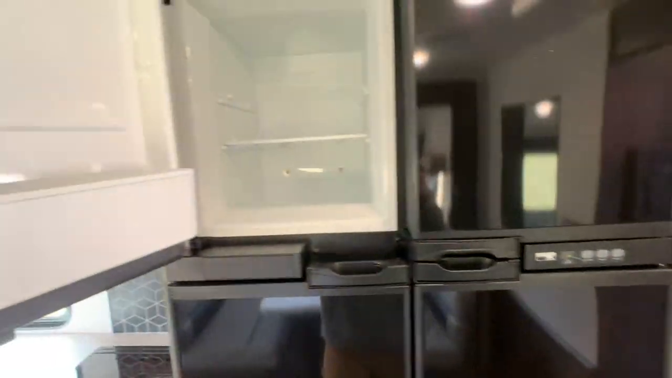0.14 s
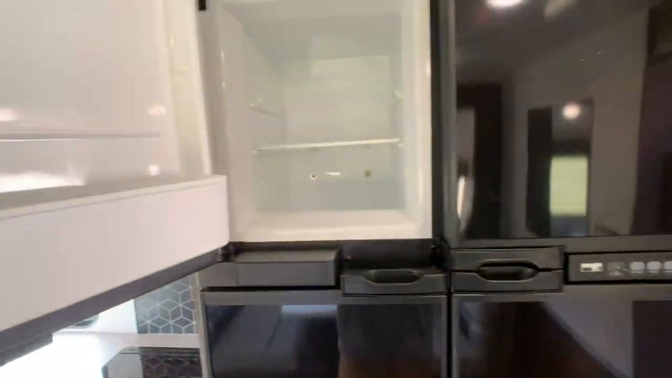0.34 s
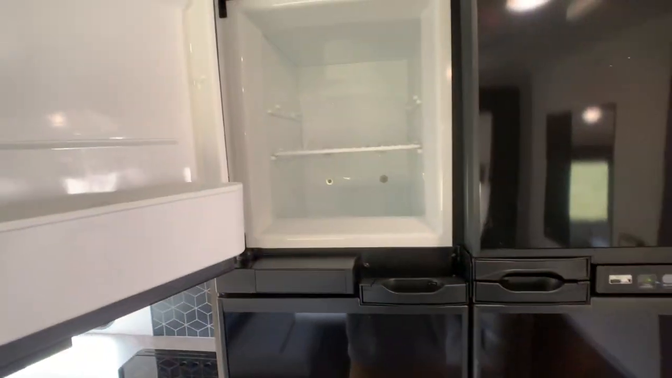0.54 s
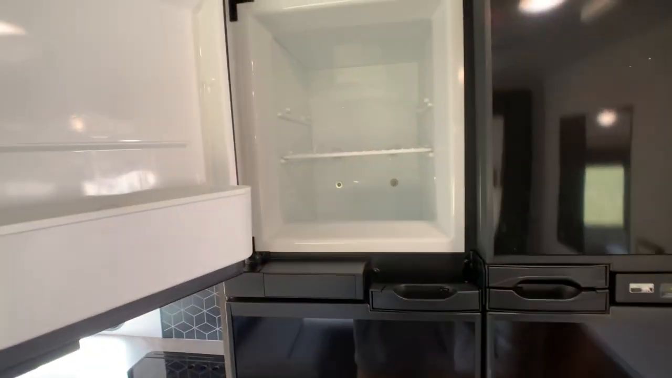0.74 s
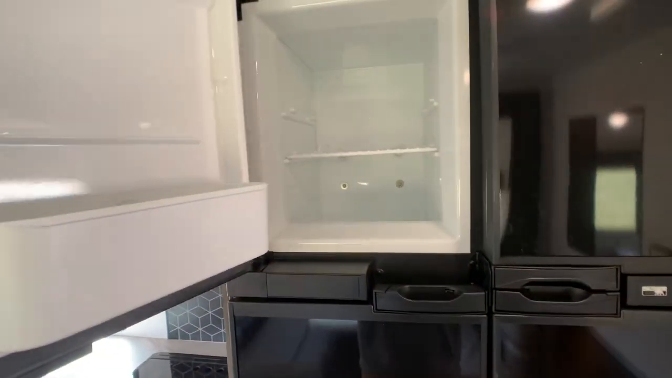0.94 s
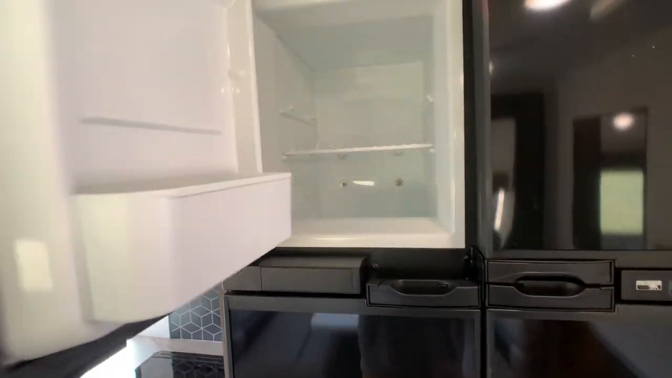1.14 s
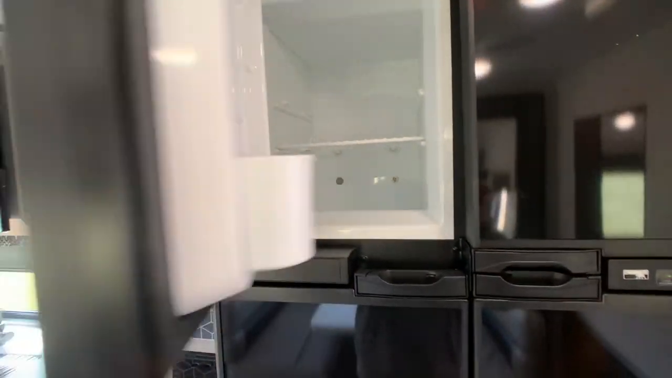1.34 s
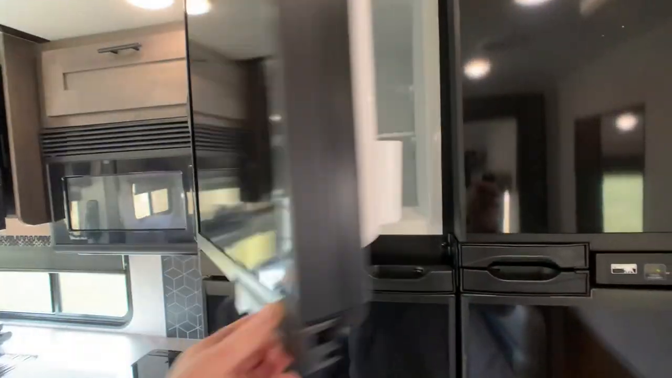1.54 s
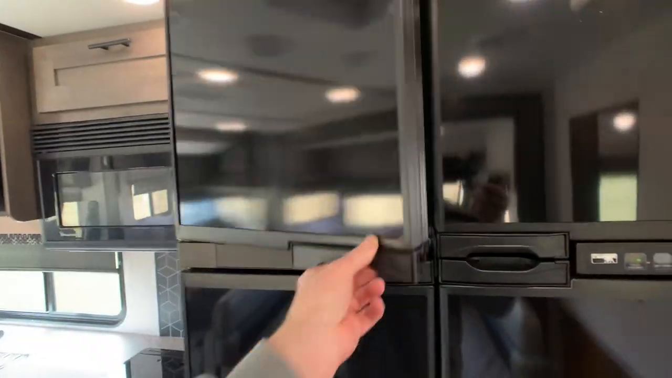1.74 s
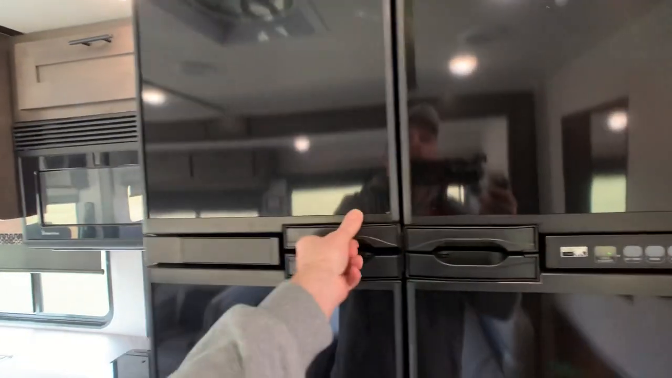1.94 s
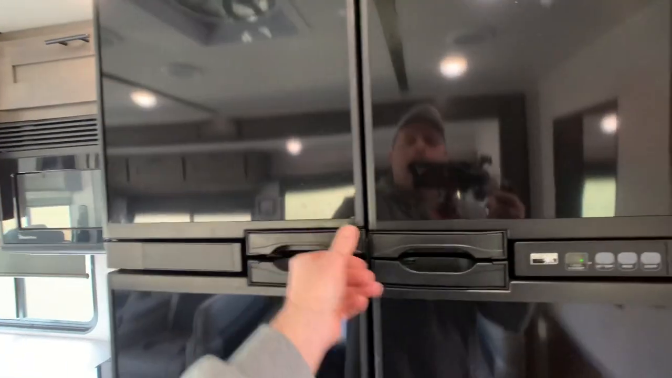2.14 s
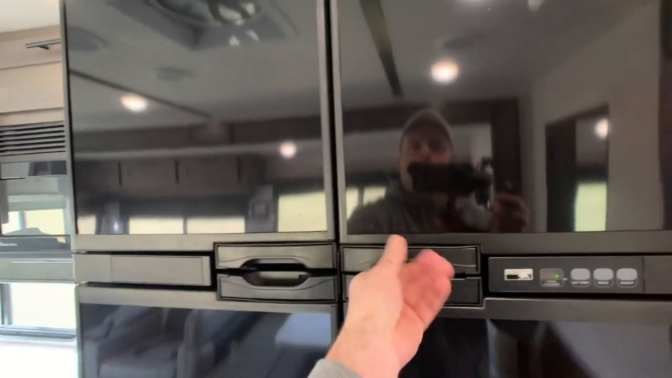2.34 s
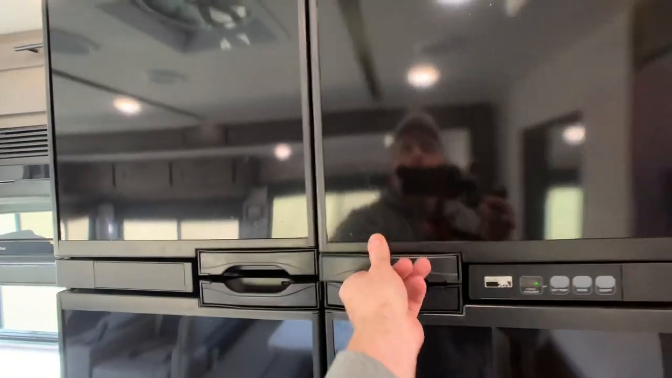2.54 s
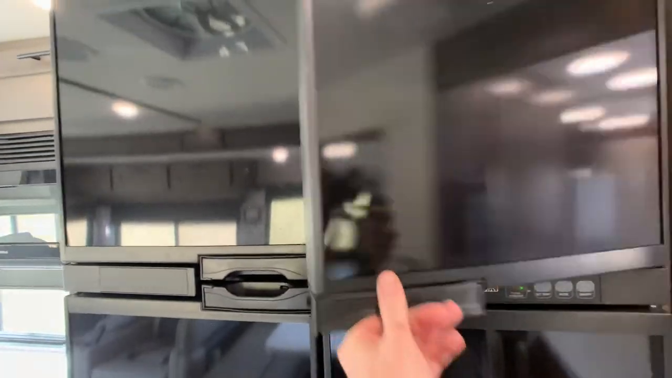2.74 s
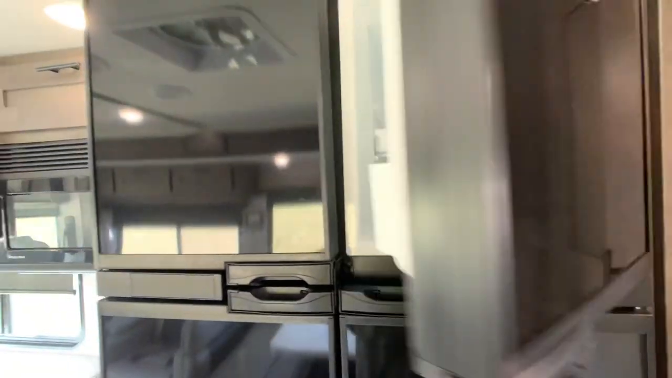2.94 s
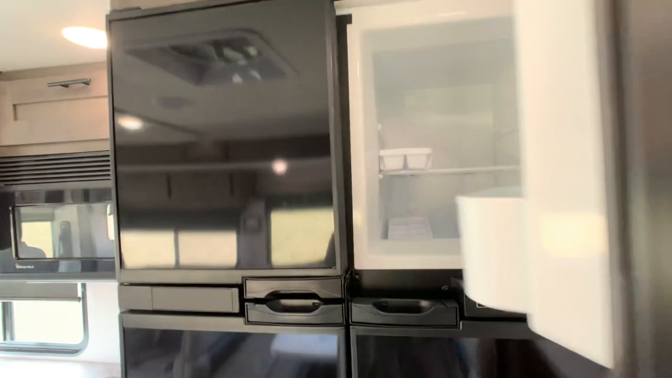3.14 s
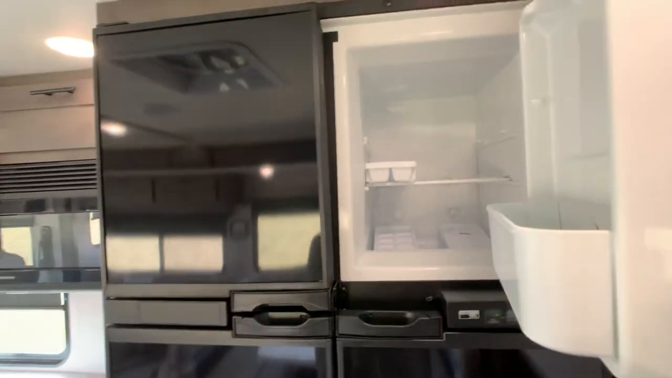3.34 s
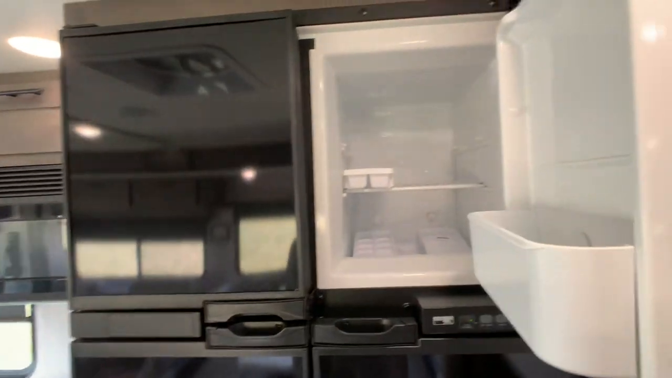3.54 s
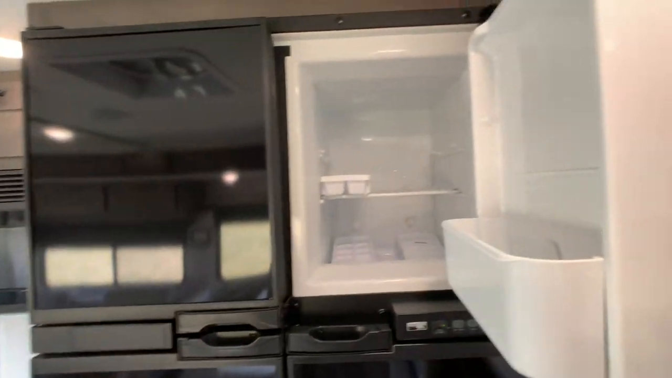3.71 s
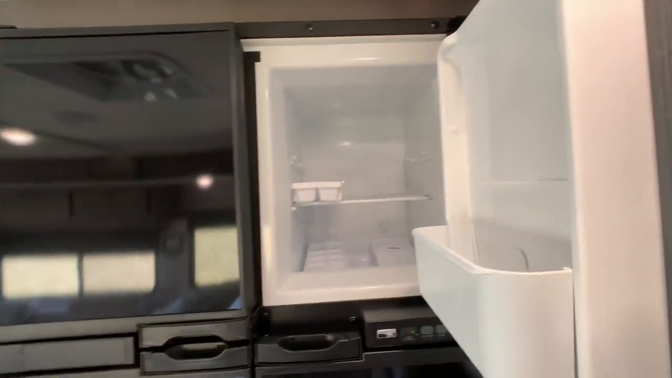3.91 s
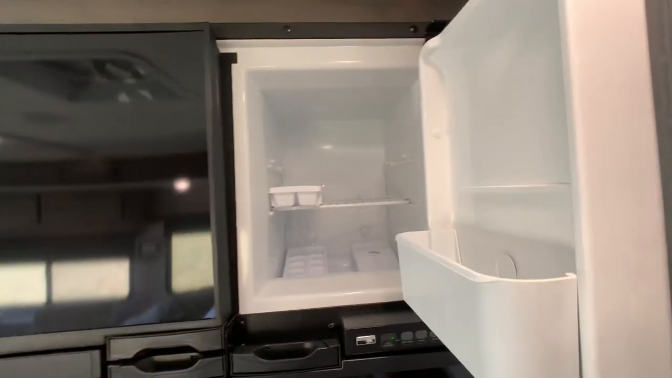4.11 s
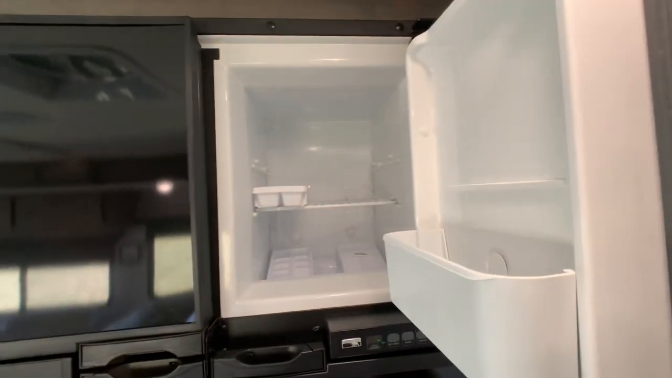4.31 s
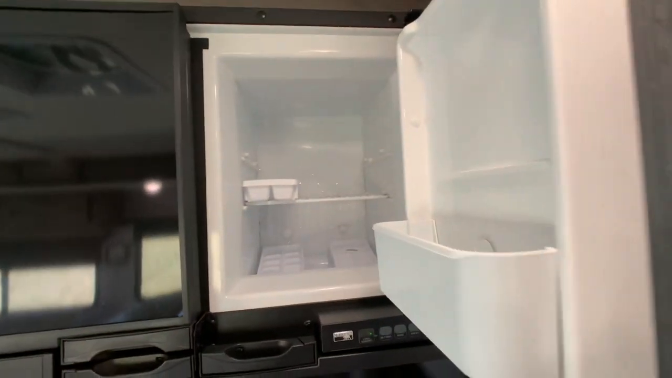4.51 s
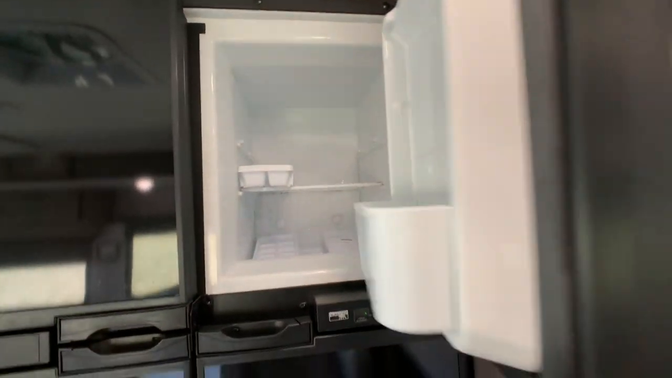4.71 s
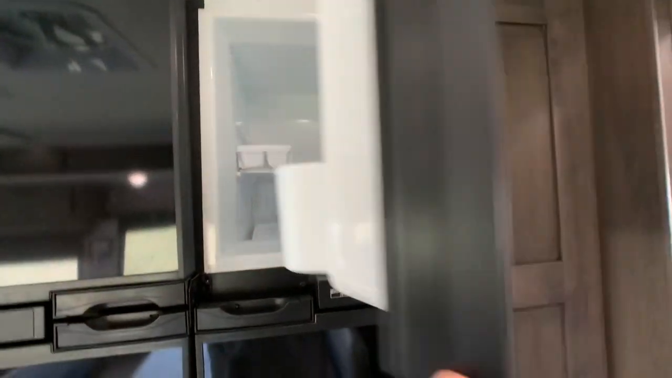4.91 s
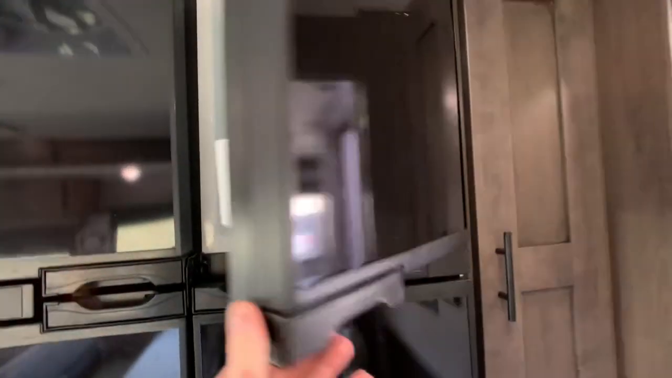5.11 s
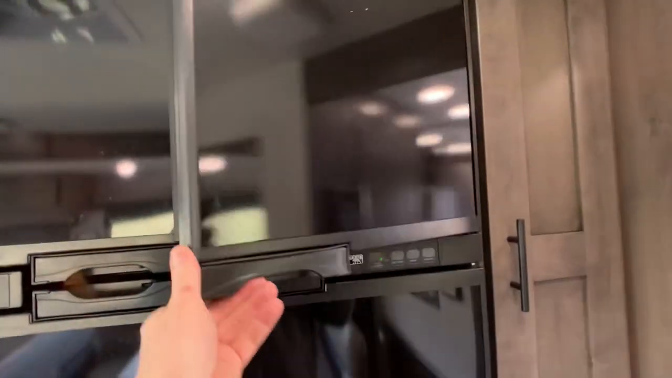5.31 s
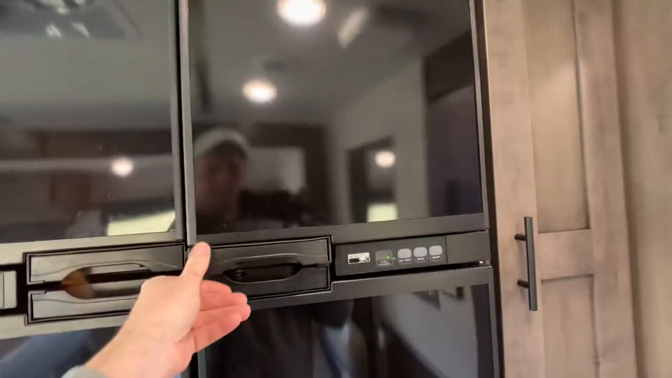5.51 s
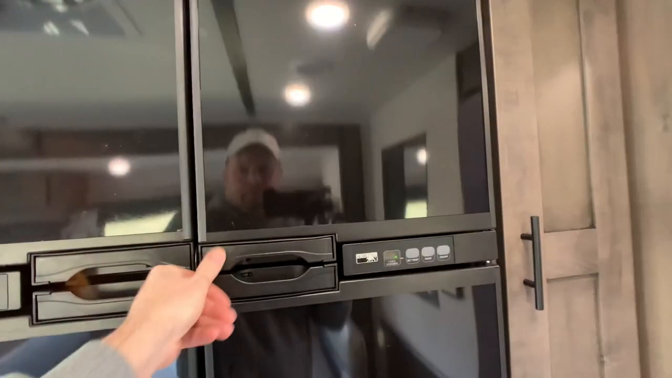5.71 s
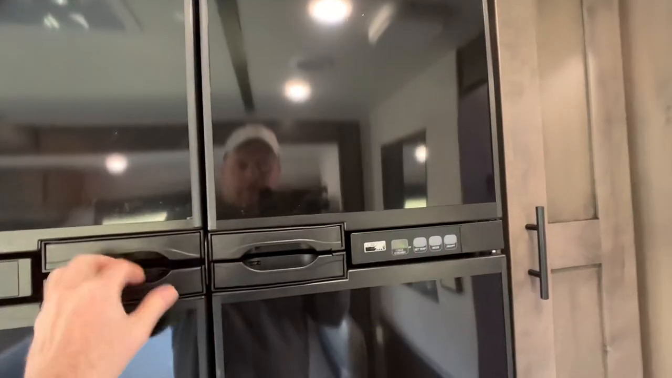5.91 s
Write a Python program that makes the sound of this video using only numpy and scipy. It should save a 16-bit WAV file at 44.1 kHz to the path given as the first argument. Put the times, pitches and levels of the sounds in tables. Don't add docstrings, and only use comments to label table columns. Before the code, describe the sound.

Close plastic latches clack as two hollow refrigerator doors swing and slam shut in a small cabin, with shelf rattles over faint hum.

```python
import sys
import numpy as np
from scipy import signal
from scipy.fft import rfft, irfft, next_fast_len
from scipy.io import wavfile
from scipy.ndimage import map_coordinates

SR = 44100
rng = np.random.default_rng(int(sys.argv[2]) if len(sys.argv) > 2 else 0)


def decibels_to_gain(level_db):
    exponent = np.asarray(level_db, float) / 20
    return 10 ** exponent


def file_out(sig):
    cols = np.atleast_2d(sig).T
    lim = np.clip(cols, -1, 1)
    pcm = np.round(lim * 32767).astype(np.int16)
    wavfile.write(sys.argv[1], SR, pcm)


N = 267246


def unit(x):
    return x / np.sqrt(np.mean(x ** 2) + 1e-20)


def along(points, hz):
    f, v = np.transpose(points)
    return np.interp(np.log(hz + 0.84), np.log(f + 0.055), v)


def curve(rows):
    s, db = np.transpose(rows)
    after = db[-1] if s[-1] > N / SR - 0.05 else -150
    return np.interp(np.arange(N) / SR, s, db, left=-150, right=after)


def wobble(rate):
    knots = rng.standard_normal(int(N * rate / SR) + 4)
    return map_coordinates(knots, [np.arange(N) * rate / SR])


def filtered(x, response):
    m = next_fast_len(x.shape[-1] + SR // 8)
    spectrum = rfft(x, m) * response(np.fft.rfftfreq(m, 1 / SR))
    return irfft(spectrum, m)[..., :x.shape[-1]]


def noise(spectrum):
    return unit(filtered(rng.standard_normal(N), lambda hz: decibels_to_gain(along(spectrum, hz))))


def strokes(rows, rise, fall):
    t = np.arange(N) / SR
    gain = np.zeros(N)
    for s, hold, db in rows:
        swell = rise * np.maximum(s - t, 0)
        fade = fall * np.maximum(t - s - hold, 0)
        gain += decibels_to_gain(db - swell - fade)
    return gain


def ring(x, modes, top_hz):
    def body(f):
        total = 0
        for k, (hz, width, db) in enumerate(modes):
            resonance = 1j * f * width / (hz * hz - f * f + 1j * f * width)
            total = total + (-1) ** k * decibels_to_gain(db) * resonance
        return total / (1 - (f / top_hz) ** 2 + 1.4j * f / top_hz)

    power = np.mean(abs(body(np.linspace(0, SR / 2, 3500))) ** 2)
    return filtered(x, body) / np.sqrt(power)


def chatter(length, rise, spiky_db):
    t = np.arange(SR // 6) / SR
    length = max(length, 0.0005)
    bumps = np.repeat(decibels_to_gain(spiky_db * rng.standard_normal(len(t) // 64 + 1)), 64)[:len(t)]
    shape = (1 - np.exp(-t / (rise * length))) * np.exp(-(t / length) ** 1.3)
    force = rng.standard_normal(len(t)) * shape * bumps
    energy = np.linalg.norm(shape)
    return np.array([force * energy / np.linalg.norm(force), energy * (t == 0)])


# (frequency [Hz], time to fall 60 dB [s])
CABIN = [(60, 0.38), (160, 0.34), (420, 0.24), (1100, .25), (3000, 0.33), (8000, 0.33), (15000, 0.19)]


def cabin(x, build):
    hz, t, z = signal.stft(rng.standard_normal(SR // 3), SR, nperseg=256)
    fading = z * decibels_to_gain(-60 * t / along(CABIN, hz)[:, None])
    tail = signal.istft(fading, SR, nperseg=256)[1]
    tail = tail * (1 - np.exp(-np.arange(len(tail)) / SR / build))
    return signal.fftconvolve(x, tail / np.linalg.norm(tail))


def placed(sounds, wet_db):
    lead = SR // 10
    out = np.zeros(N + lead + 2 * SR)
    for s, length, (near, push) in sounds:
        far = cabin(0.86 * push + 0.4 * near, 0.002 + 0.25 * abs(length))
        start = round(s * SR) + lead
        out[start:][:len(near)] += near
        out[start:][:len(far)] += decibels_to_gain(wet_db) * far
    return out[lead:lead + N]


# (frequency [Hz], level [dB per Hz])
HISS = [(500, -33), (900, -6), (2000, -13.5), (4500, -15), (9000, -15.5), (14400, -24.5), (15700, -20.5)]


def hiss():
    return decibels_to_gain(-83.5) * noise(HISS)


# (frequency [Hz], level [dB per Hz])
SWAY = [(1, -41.5), (3, -8), (7, 2), (11, -2.5), (16, -12.5), (26, -33), (45, -42), (70, -73), (120, -120)]
# (time [s], level [dB])
SWAYING = [(0.0, -11.5), (0.07, -36.5), (0.57, -28.5), (0.66, -37), (1.77, -27), (1.96, -32.5),
           (2.16, -30.5), (2.33, -34.5), (2.45, -27), (2.58, -40), (2.65, -30), (3.75, -28), (3.85, -45),
           (3.91, -33), (5.96, -34.5), (6.06, -22.5)]


def air_pressure():
    return decibels_to_gain(curve(SWAYING)) * noise(SWAY)


# (frequency [Hz], level [dB per Hz])
HUM = [(40, -60), (62, -15.5), (78, -5.5), (89, -6), (100, -12), (125, -18.5), (190, -65.5)]


def hum():
    motor = unit(decibels_to_gain(1.5 * wobble(5.6)) * noise(HUM))
    open_door = strokes([(2.6, 2.07, -70.5)], rise=60, fall=30.5)
    return decibels_to_gain(3.5) * (decibels_to_gain(-69.5) + open_door) * motor


# (frequency [Hz], level [dB per Hz])
MURMUR = [(90, -48), (150, -8.5), (200, -7), (240, -6.5), (290, 0), (335, -8.5), (385, -0.5), (450, -9.5),
          (520, -5.5), (620, -13.5), (1000, -24), (1600, -38)]
# (time [s], level [dB])
STIR = [(0.0, -62.5), (0.18, -79.5), (0.74, -82), (1.28, -81), (1.5, -74.5), (1.64, -75.5), (2.45, -77),
        (2.58, -60.5), (2.68, -61.5), (2.85, -74), (3.85, -86), (4.25, -89), (5.43, -77.5), (5.64, -58),
        (5.96, -72), (6.06, -54)]


def murmur():
    level = decibels_to_gain(-67.5) + decibels_to_gain(curve(STIR) + 3)
    return level * unit(decibels_to_gain(1.2 * wobble(6.7)) * noise(MURMUR))


# (frequency [Hz], level [dB per Hz])
MOVING = [(500, -25), (800, -4.5), (1500, -3), (3000, -11), (5000, -13), (9000, -32)]
# (frequency [Hz], level [dB per Hz])
CLOTH = [(400, -54), (900, -5), (2000, -7), (3500, -10), (6000, -9.5), (9000, -14.5), (13000, -28),
         (16000, -32)]
# (time [s], hold [s], level [dB])
STROKES = [(1.094, .01, -72), (1.25, .01, -71), (3.15, .2, -75), (3.64, .095, -76), (4.4, .02, -72),
           (4.51, 0.026, -71.5), (4.776, .05, -72), (5.385, 0.015, -61.5)]


def sleeves():
    grains = decibels_to_gain(1.9 * wobble(370) + 1.1 * wobble(36))
    rubbing = strokes(STROKES, rise=350, fall=184) * unit(grains * noise(CLOTH))
    stirring = decibels_to_gain(curve(STIR) + 3.5 + 1.3 * wobble(7.4)) * noise(MOVING)
    return rubbing + stirring


# (frequency [Hz], width [Hz], level [dB])
LATCH = [(1300, 440, -5), (1696, 310, 0), (1897, 310, -1), (2437, 320, -7), (3000, 620, -10)]
# (frequency [Hz], width [Hz], level [dB])
DOOR = [(330, 50, -2), (524, 110, 3), (622, 270, 0), (940, 260, -3), (1143, 200, -12)]
# (frequency [Hz], width [Hz], level [dB])
SNAP = [(3820, 1200, 1), (5370, 490, 2.5), (5820, 650, 1.5), (7140, 470, -2), (8180, 900, -5),
        (13480, 1700, -21)]
# (time [s], hold [s], level [dB])
SCRAPES = [(1.25, 0.18, -68), (2.42, .18, -60), (2.63, 0.13, -57), (2.75, 0.033, -54), (5.5, 0.11, -74),
           (5.94, .07, -56), (6.04, .03, -58)]


def scraping():
    slips = decibels_to_gain(3.7 * wobble(250) + 4.8 * wobble(40)) * rng.standard_normal(N)
    plastic = ring(slips, LATCH, 4000)
    plastic += decibels_to_gain(2.0) * ring(slips, DOOR, 1300)
    plastic += decibels_to_gain(-3.0) * ring(slips, SNAP, 9000)
    return strokes(SCRAPES, rise=230, fall=140) * decibels_to_gain(-2.5) * unit(plastic)


# (frequency [Hz], width [Hz], level [dB])
WIRE = [(1850, 27, -0.5), (2730, 84, 0), (3140, 28, -3.5), (3410, 37, -3.5), (6060, 32, -8.5),
        (6380, 36, -10.5)]
# (time [s], peak level [dB], chatter [s])
WIRE_HITS = [
    (1.3786, -61, .004),
    (1.411, -41.5, 0.005),
    (1.568, -47, .006),
    (1.586, -46.5, .01),
]


def wire_shelf():
    for s, db, length in WIRE_HITS:
        push = chatter(length, rise=0.15, spiky_db=2.8)
        yield s, length, decibels_to_gain(db) * ring(push, WIRE, 9000)


# (time [s], peak level [dB], chatter [s])
SEAL = [
    (2.0, -35, 0.043),
    (5.702, -33.5, 0.027),
]
CABINET = [(0, -32, 0.018), (1.897, -32, .025), (1.93, -26, .018), (2.489, -50, 0.022), (2.614, -36, 0.024),
           (5.5, -38, 0.045), (5.601, -26.5, 0.026)]
PANEL = [(1.94, -25, 0.0086), (2.856, -46.5, 0.015), (3.722, -53.5, .022), (5.605, -35.5, 0.036),
         (6.045, -51, .019)]
SKIN = [(.01, -41, .028), (1.42, -58, 0.0068), (1.574, -47, 0.0093), (1.934, -18, .024), (5.04, -56, .012)]
LINER = [(1.29, -63, .022), (1.935, -23.5, 0.01), (2.518, -31.5, .007), (2.545, -44.5, 0.017),
         (2.746, -52, 0.016)]
HANDLE = [(1.932, -17.5, .005), (2.622, -40.5, 0.017), (5.642, -19, 0.0036)]
TONGUE = [(2.567, -45, 0.06), (2.603, -35.5, .017), (2.621, -49, 0.022), (5.025, -46.5, 0.012),
          (5.508, -34.5, 0.017), (5.53, -32.5, 0.016), (5.546, -24, .013)]
CLIP = [(1.579, -45.5, 0.013), (2.746, -41.5, 0.011), (5.964, -41, .005)]
PIN = [(.636, -66, .0017), (2.57, -53.5, 0.034)]
SPRING = [(5.916, -60, .006), (5.995, -42, .003)]
RACK = [(1.415, -66, 0.016), (1.57, -61, .04)]
CATCH = [(.636, -61, 0.00095), (1.94, -27.5, .004), (2.396, -60.5, 0.0028), (3.074, -60, 0.007),
         (5.598, -19.5, .0091), (5.894, -62.5, 0.0014)]
FOIL = [(2.604, -44.5, .025)]
EDGE = [(5.599, -30, .002), (5.994, -51, .002)]
TAB = [(2.604, -37.5, 0.0135), (2.478, -55, 0.0038)]
FINGER = [(5.893, -49, 0.0032), (5.939, -44, .004), (5.996, -43.5, 0.0038), (2.396, -56.5, 0.0037)]
# (frequency [Hz], width [Hz], its contacts)
PARTS = [(31.6, 18, SEAL), (86, 25, CABINET), (175, 60, PANEL), (318, 55, SKIN), (515, 220, LINER),
         (900, 200, HANDLE), (1760, 250, TONGUE), (2893, 350, CLIP), (3200, 290, FINGER), (4300, 660, PIN),
         (7480, 700, TAB), (5430, 180, SPRING), (6300, 620, RACK), (7900, 1400, CATCH), (10490, 3000, FOIL),
         (13000, 6000, EDGE)]


def knocks():
    for hz, width, rows in PARTS:
        for s, db, length in rows:
            push = chatter(length, rise=0.12, spiky_db=2)
            yield s, length, decibels_to_gain(db) * ring(push, [(hz, width, 0)], 1.25 * hz)


def contacts(rows, middle, tone_hz, rise, crack_db):
    for s, db, door_db, snap_db, length in rows:
        push = chatter(length, rise, spiky_db=4)
        near = ring(push, middle, 4500)
        near += decibels_to_gain(-5.0) * ring(push, [(tone_hz, tone_hz * 0.084, 0)], 4500)
        snap = chatter(0.89 * length, rise, spiky_db=4)
        snap += decibels_to_gain(crack_db) * chatter(0.00075, 0.2, 3)
        bright_hz = np.clip(16997.0 + 230 * (db + snap_db + 19.0), 5000, 20000)
        near += decibels_to_gain(snap_db + 5) * ring(snap, SNAP, bright_hz)
        near += decibels_to_gain(door_db + 7.5) * ring(chatter(length, rise, spiky_db=4), DOOR, 1100)
        yield s, length, decibels_to_gain(db - 9) * near


# (frequency [Hz], width [Hz], level [dB])
SHELF = [(1140, 180, -7), (1500, 430, 1.5), (1900, 170, -2), (2256, 370, -6), (2717, 190, -2.5),
         (3400, 470, -5.5)]
# (time [s], peak level [dB], door re shelf [dB], snap re shelf [dB], chatter [s])
LEFT_SWING = [(.2644, -66, -10, -7.5, 0.0067), (.5035, -56.5, -5.5, -21.5, 0.0045),
              (.8063, -44.5, -8.5, -19, 0.0028), (.881, -56, -1, -14.5, 0.031),
              (.9247, -60.5, -8, -15, .013), (1.2545, -56, -5.5, -17, 0.055), (1.292, -47.5, -7, -16, .03),
              (1.3124, -50, -18, -6, .0094), (1.3786, -47, -18, -14, 0.0077),
              (1.4105, -35.5, -11, -12, 0.016), (1.4306, -44, -10, -23, 0.014),
              (1.4597, -63, -24, -10.5, 0.011), (1.5663, -35.5, -12, -13.5, .0099),
              (1.5883, -49, 5.5, 4.5, 0.0043)]
RIGHT_SWING = [(2.9892, -59.5, 6, -6, 0.011), (3.0732, -45.5, -7.5, -8.5, 0.0058),
               (3.1283, -46, -4.5, -27, 0.0038), (3.1532, -49, -20.5, -20.5, .0055),
               (3.4093, -59, -8, -24, 0.012), (3.5594, -65, -2, -12.5, .011),
               (3.6355, -58, -17, -14.5, .011), (3.7163, -51, -6, -16.5, 0.0092),
               (4.9681, -61, -9, -14.5, 0.0091), (5.0277, -45, -2.5, -7, .011),
               (5.0939, -42.5, -9, -18, 0.0074)]


def swinging():
    total = 0
    for rows, tone_hz in [(LEFT_SWING, 1800), (RIGHT_SWING, 1224)]:
        ticks = contacts(rows, SHELF, tone_hz, rise=0.25, crack_db=-0.5)
        total = total + placed(ticks, wet_db=0.0)
    return total


# (time [s], peak level [dB], door re latch [dB], snap re latch [dB], chatter [s])
SHUTTING = [
    (-.03, -33.5, 2, -10, 0.014),
    (1.8896, -24, 0, -17.5, .0074),
    (1.891, -24.5, -5.5, -7, 0.026),
    (1.933, -10.5, -0.8, -8.5, .0085),
    (1.9384, -18, -11, -9.5, .016),
    (1.9656, -22, -17.5, -5.5, .007),
]
SHUTTING_RIGHT = [
    (5.3836, -49, -6.5, -24.5, 0.028),
    (5.4883, -43, -7, -19, 0.0086),
    (5.4956, -35, -3.5, -15, 0.019),
    (5.5085, -35.5, 1.7, -13.5, 0.036),
    (5.5402, -26.5, -7.5, -1.5, 0.012),
    (5.5485, -25.5, -9, -4.5, 0.006),
    (5.5986, -15, -6.5, -8, .012),
    (5.6024, -11, -3, -2.15, 0.0073),
    (5.6435, -24, -6.5, -38, 0.0084),
]
PULLING = [(2.395, -47, -3.5, -15, 0.039), (2.4365, -39.5, -4, -19, .018), (2.4779, -35, -5.5, -13, 0.016),
           (2.6078, -32.5, -0.7, -8, 0.016), (2.733, -34, -6.5, -5.5, 0.0095),
           (2.7441, -41.5, -3, -2, 0.029), (2.8137, -45.5, -6.5, -7.5, 0.02), (5.7894, -51.5, 6, 0.1, 0.02),
           (5.893, -44, -9, -5, 0.0051), (5.9182, -47, 1, -2, 0.005), (5.9369, -43.5, -4.5, -8, 0.019),
           (5.9651, -37.5, -4.5, -12, 0.0084), (5.9958, -33, -15, -6.5, 0.0043),
           (6.0312, -47, -18, -13, .0092)]


def latches():
    total = 0
    for rows, tone_hz in [(SHUTTING, 1456), (SHUTTING_RIGHT, 1790), (PULLING, 1537)]:
        strikes = contacts(rows, LATCH, tone_hz, rise=0.11, crack_db=-1)
        total = total + placed(strikes, wet_db=-4.0)
    return total


def scene():
    doors = latches() + swinging()
    parts = placed(knocks(), wet_db=-8) + placed(wire_shelf(), wet_db=-2.5)
    hands = scraping() + sleeves()
    background = hum() + murmur() + air_pressure() + hiss()
    return (doors + parts + hands + background)[None]


def top_cut(x):
    return signal.sosfilt(signal.butter(12, 16370, fs=SR, output="sos"), x)


def record(dry):
    mix = filtered(dry, lambda hz: hz < 16050)
    return top_cut(mix)


dry = scene()
out = record(dry)
file_out(out)
```